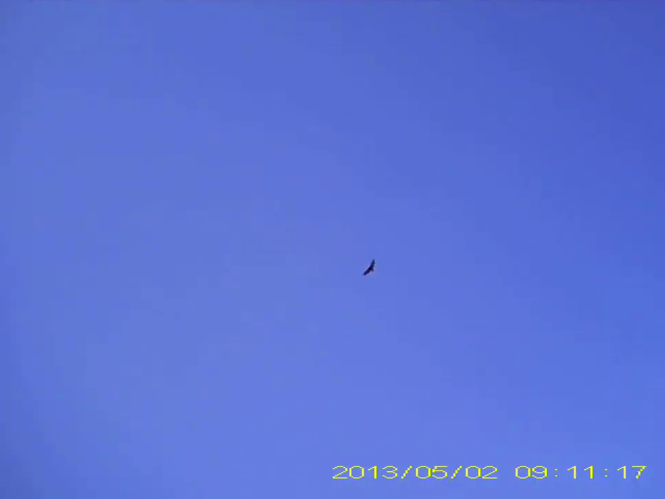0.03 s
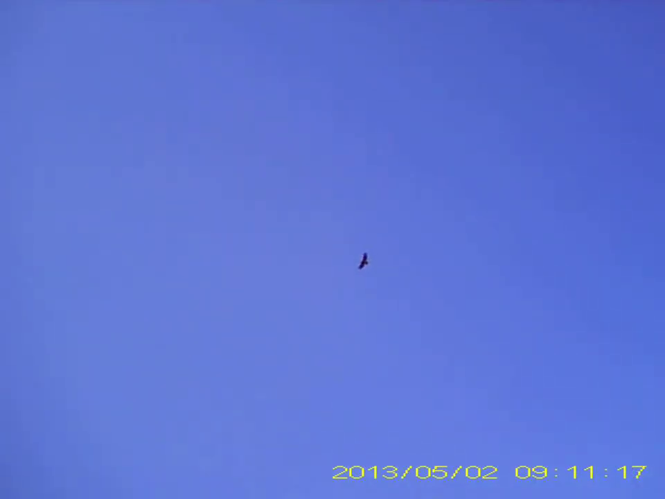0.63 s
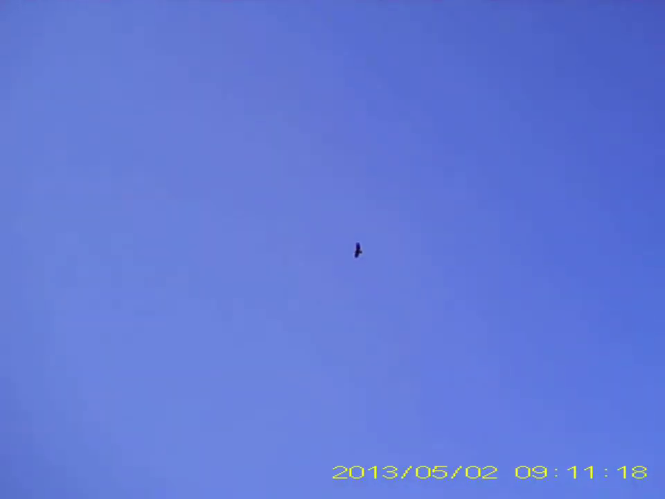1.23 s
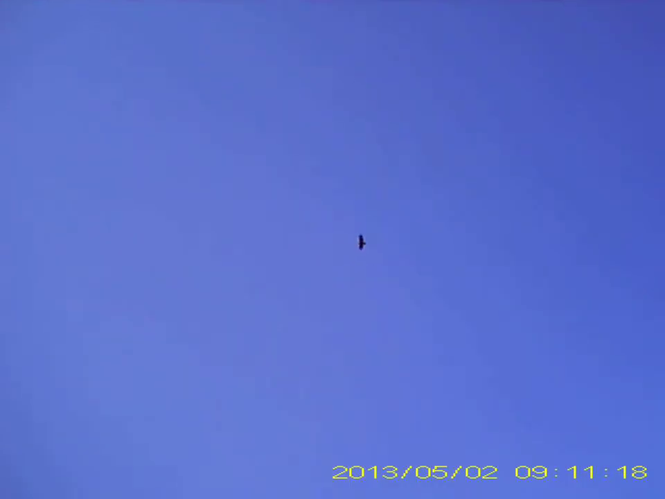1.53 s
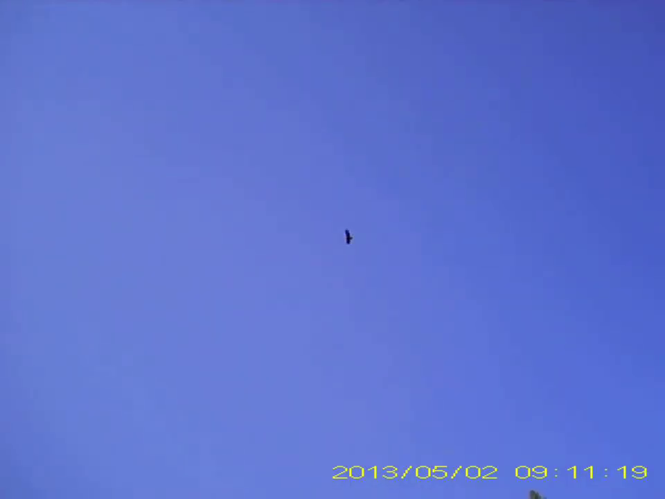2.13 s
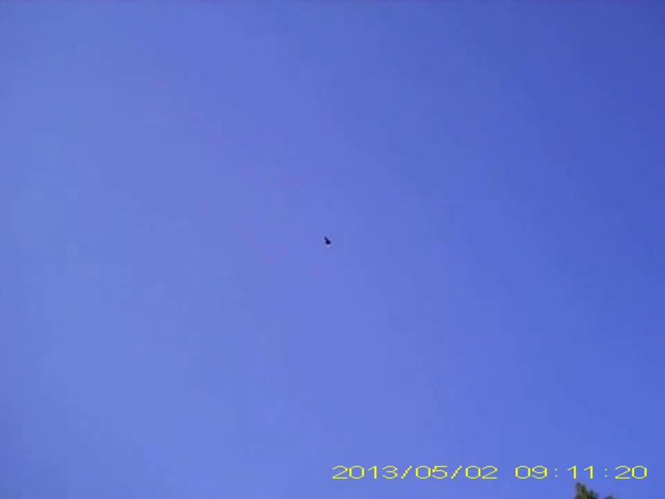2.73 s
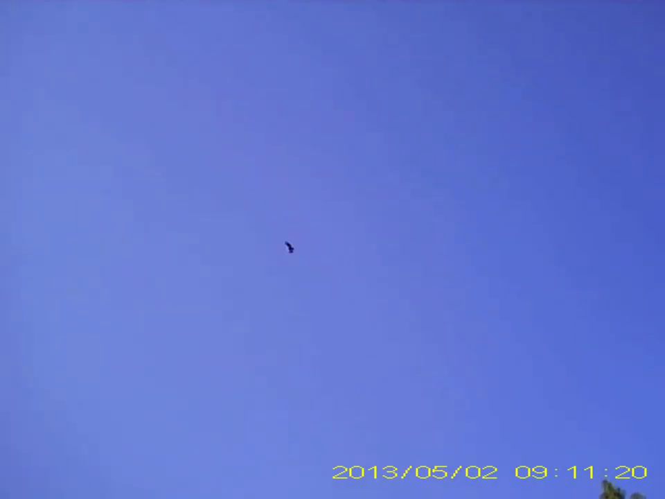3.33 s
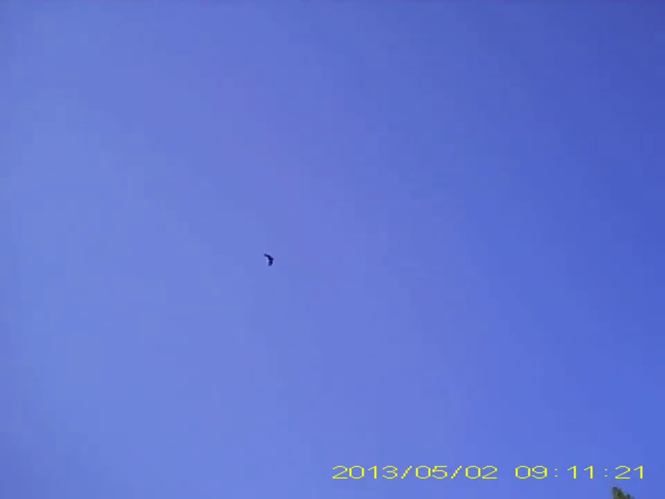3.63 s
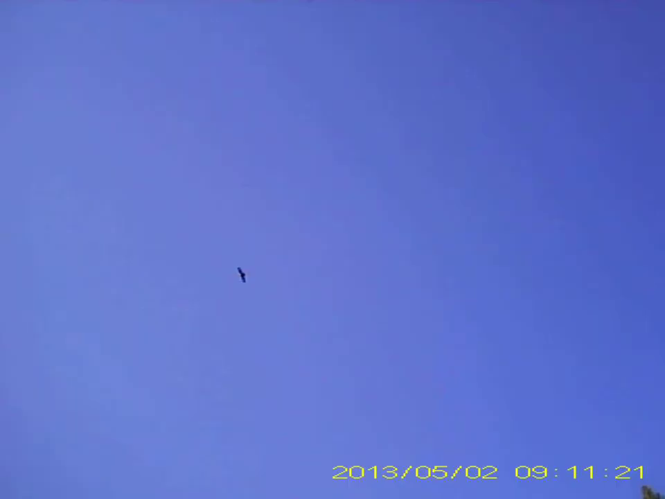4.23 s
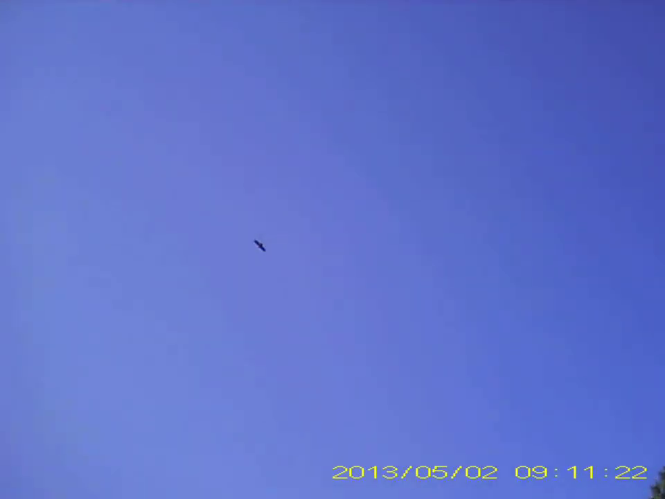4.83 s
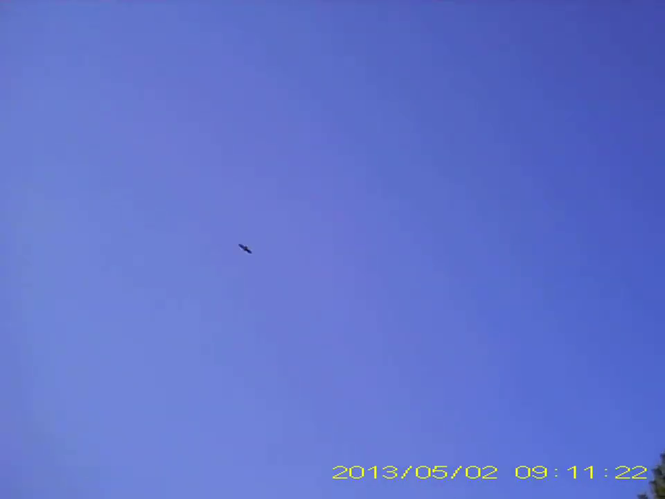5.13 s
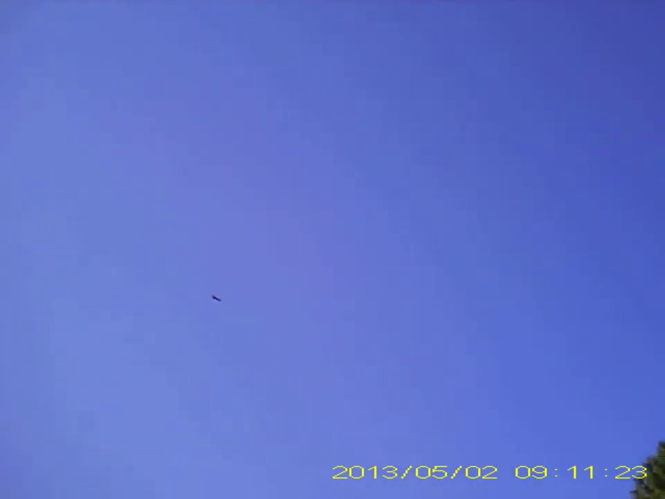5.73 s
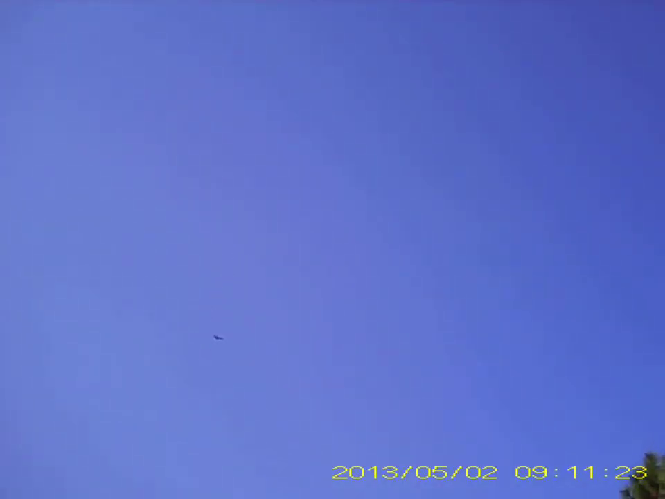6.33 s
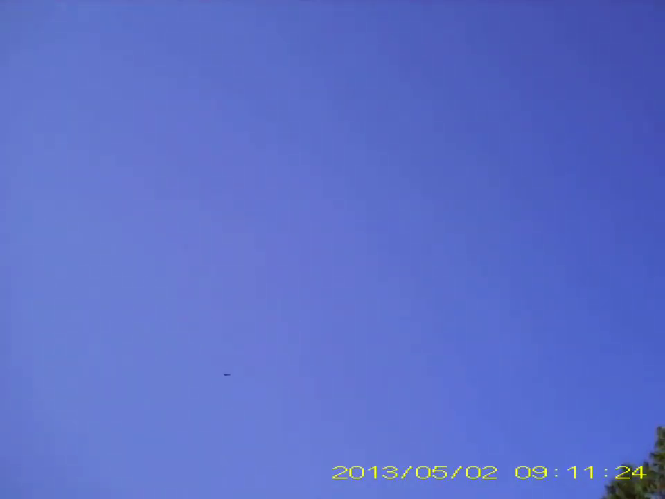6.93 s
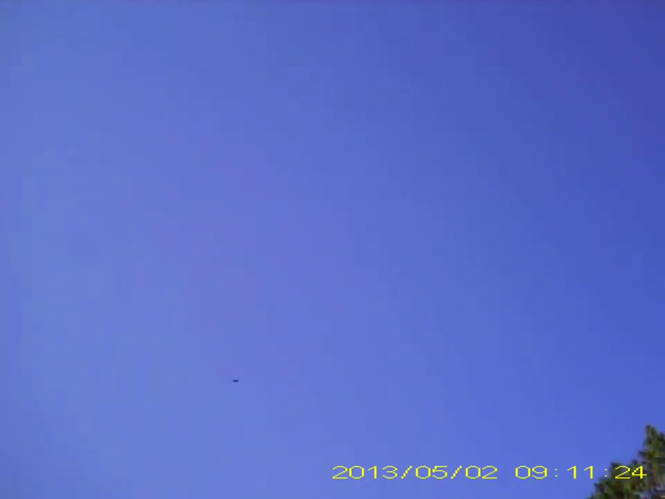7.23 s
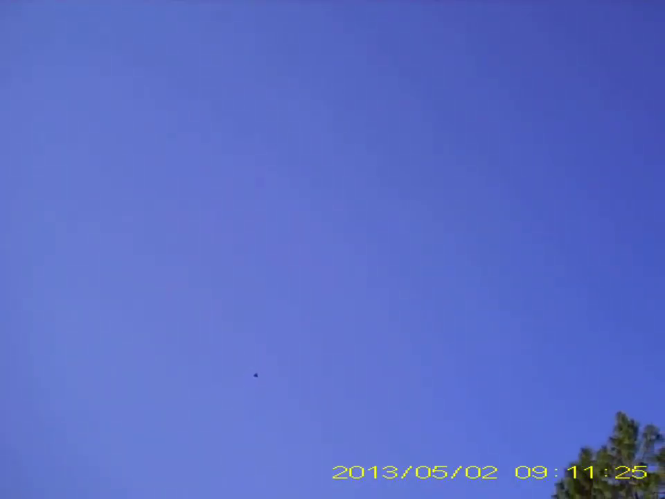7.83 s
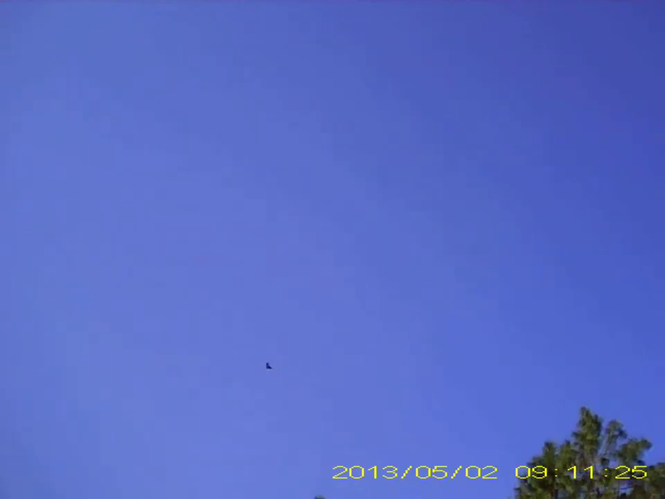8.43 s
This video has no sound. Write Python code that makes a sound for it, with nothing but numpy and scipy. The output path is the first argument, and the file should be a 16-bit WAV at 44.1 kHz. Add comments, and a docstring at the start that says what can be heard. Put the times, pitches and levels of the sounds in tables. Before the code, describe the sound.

A single raspy hawk scream sounds from high in the open sky, lasting about a second and a half and sagging slightly in pitch. Before and after it, low wind flutters against the microphone, gusty at first and then in weaker puffs. A few very faint peeps from a small bird follow the scream. Underneath are an even hiss, a thin electronic whine and regular soft ticking from the camera.

```python
"""Hawk scream in light wind

A hawk far overhead gives one long hoarse scream: a short yelp, a leap in pitch, then two rasping
tones, one from each side of the syrinx. A small bird peeps faintly; trees echo both birds.
Wind buffets the microphone of a small camera, whose electronics hiss, whine and tick twice a second."""
import sys
import numpy as np
from scipy import signal
from scipy.fft import rfft, irfft, next_fast_len
from scipy.io import wavfile
from scipy.ndimage import map_coordinates

SR = 44100
rng = np.random.default_rng(int(sys.argv[2]) if len(sys.argv) > 2 else 0)


def transcribe(signal):
    """Save signal, clipped to [-1, 1], as a 16-bit WAV file at the path in sys.argv[1]."""
    frames = np.atleast_2d(signal).T
    limited = np.clip(frames, -1, 1)
    pcm = np.round(limited * 32767).astype(np.int16)
    wavfile.write(sys.argv[1], SR, pcm)


N = 373527
TIME_S = np.arange(N) / SR


def amp(db):
    """Decibels to gain."""
    return 10 ** (np.asarray(db) / 20)


def unit(x):
    """Scale to rms 1."""
    return x / np.sqrt(np.mean(x ** 2) + 1e-20)


def curve(points):
    """(t/s, value) points to one value per sample."""
    return np.interp(TIME_S, *np.transpose(points))


def bump(centre_s, width_s):
    """Gaussian of height 1; width_s from centre to 1/e."""
    return np.exp(-np.minimum(((TIME_S - centre_s) / width_s) ** 2, 50))


def ramp(start_s, length_s):
    """Linear rise from 0 to 1."""
    return np.clip((TIME_S - start_s) / length_s, 0, 1)


def wobble(rate_hz):
    """Smooth random curve, rate_hz knots a second."""
    knots = rng.standard_normal(int(N * rate_hz / SR) + 4)
    return map_coordinates(knots, [np.arange(N) * rate_hz / SR])


def filtered(x, response):
    """Apply a complex frequency response."""
    size = next_fast_len(N + SR // 2)
    return irfft(rfft(x, size) * response(np.fft.rfftfreq(size, 1 / SR)), size)[:N]


def noise(spectrum):
    """Noise of rms 1, coloured by (f/Hz, relative level/dB) points on a log axis."""
    knots_hz, db = np.transpose(spectrum)
    colour = lambda hz: amp(np.interp(np.log(hz + 1), np.log(knots_hz), db, left=-120, right=-120))
    return unit(filtered(rng.standard_normal(N), colour))


def tones(lines):
    """Steady sines of random phase from (f/Hz, rms level/dB) rows."""
    return sum(np.sqrt(2) * amp(db) * np.sin(2 * np.pi * (hz * TIME_S + rng.random()))
               for hz, db in lines)


# Hiss spectrum: f/Hz, relative level/dB
HISS_SPECTRUM = [(60, -8), (200, 0), (400, -2.5), (600, -5), (1000, -7.5), (1900, -11), (2500, -15.5),
                 (3200, -18.5), (4200, -22), (5500, -27.5), (7500, -31.5), (10300, -35.5), (11300, -37),
                 (12000, -58)]

def hiss():
    """Even rush of air and microphone noise."""
    return amp(-60.5 + 0.18 * wobble(11)) * noise(HISS_SPECTRUM)


# Steady hum and gated readout lines: f/Hz, rms level/dB
HUM_LINES = [(275, -69.5), (385.7, -77), (771.4, -80.5), (1157.1, -82.5), (1542.8, -85), (10702.1, -81),
             (11347.9, -88)]
READOUT_LINES = [(3021.4, -88.5), (3407.1, -87.5), (3792.9, -83), (4178.6, -76), (4564.3, -74), (4950, -88),
                 (5335.6, -96.5), (8357.1, -99), (8742.9, -84.5), (9128.6, -91), (9514.3, -98.5),
                 (9900, -100)]

def whine(frame_hz=17.141, pause_phase=0.838, half_pause_s=.0016, edge_s=.0004):
    """Camera hum, plus image sensor readout that pauses between frames."""
    from_pause_s = np.abs((TIME_S * frame_hz - pause_phase + .5) % 1 - .5) / frame_hz
    reading = np.clip((from_pause_s - half_pause_s) / edge_s, 0, 1)
    return tones(HUM_LINES) + reading * tones(READOUT_LINES)


# Supply steps: t/s, relative level/dB
SUPPLY_STEPS = [(0.189, -37.5), (0.6998, -42), (1.2297, -42), (1.7503, -38.5), (2.2705, -38), (2.7907, -39),
                (3.329, -38), (3.8511, -40), (4.371, -39.5), (4.8815, -40.5), (5.422, -41), (5.9319, -39.5),
                (6.452, -40), (6.9723, -41), (7.512, -38.5), (8.0828, -39)]

def ticks(leak_hz=45, edge_hz=2100):
    """The supply voltage steps up and down in turn; each step leaks away through the input coupling."""
    impulses = np.zeros(N)
    for k, (at_s, db) in enumerate(SUPPLY_STEPS):
        impulses[round(at_s * SR)] = (-1) ** k * amp(db)
    leak = lambda hz: SR / (2 * np.pi * (leak_hz + 1j * hz))
    soft_edge = lambda hz: 1 / (1 + 1.5j * hz / edge_hz - (hz / edge_hz) ** 2)
    return amp(2.4) * filtered(impulses, lambda hz: leak(hz) * soft_edge(hz))


# Buffet envelope, gusty first half, lull, three puffs: t/s, relative level/dB
GUSTS = [(0, -49.5), (.25, -47.5), (.59, -38.5), (.95, -42), (1.24, -39.5), (1.52, -49), (1.66, -42.5),
         (1.9, -48), (2.38, -39.5), (2.6, -46), (2.88, -42), (3.35, -47.5), (3.55, -43.5), (3.95, -46.5),
         (4.2, -53), (4.78, -56.5), (4.88, -44.5), (5.05, -52), (6.3, -52), (6.46, -45.5), (6.62, -53),
         (6.92, -45), (7.3, -47), (7.75, -55), (8.47, -50.5)]
# Wind spectra: f/Hz, relative level/dB
EDDY_SPECTRUM = [(8, -4), (20, 0), (45, -0.5), (80, -3.5), (120, -9.5), (180, -16), (260, -26.5),
                 (450, -41.5)]
FLUTTER_SPECTRUM = [(20, -8.5), (35, 1), (60, 3.5), (120, 1), (190, -6), (260, -17.5), (340, -21.5),
                    (500, -36), (900, -51.5)]
RUSTLE_SPECTRUM = [(200, -11), (380, 0), (600, -4), (1000, -11), (2000, -29)]

def wind(full_gust_db=-40, rustle_db=-70, rustle_db_per_db=1.6):
    """Weak air rolls over the microphone in slow eddies; gusts break into lumpy flutter and rustle."""
    level_db = curve(GUSTS)
    gusty = np.clip((level_db + 51) / 11, .02, .9)
    level_db += 1.28 * wobble(12)
    eddies = unit(noise(EDDY_SPECTRUM) * amp(0.68 * wobble(14)))
    lumps = amp(3.6 * wobble(70))
    flutter = unit(noise(FLUTTER_SPECTRUM) * lumps)
    rustle = unit(noise(RUSTLE_SPECTRUM) * lumps)
    buffet = amp(0.57) * np.sqrt(1 - gusty) * eddies + amp(0.24) * np.sqrt(gusty) * flutter
    rustle_gain = amp(rustle_db + rustle_db_per_db * (level_db - full_gust_db))
    return amp(level_db) * buffet + rustle_gain * rustle


# Single eddies: t/s, peak level/dB
EDDY_HITS = [(0.569, -31), (0.594, -28.5), (1.24, -29.5), (2.306, -27.5), (2.394, -37), (2.449, -33.5),
             (2.91, -33)]

def thumps(width_s=0.0016):
    """An eddy hitting the microphone port gives one short push between two weaker pulls."""
    lobe = lambda u: (1 - u ** 2) * np.exp(-u ** 2 / 2)
    return sum(amp(db) * lobe(np.clip((TIME_S - at_s) / width_s, -10, 10)) for at_s, db in EDDY_HITS)


def trees(x, t60_s=0.27, wet_db=-12.5):
    """Surrounding trees scatter a faint short echo."""
    delay_s = np.arange(SR // 2) / SR
    tail = rng.standard_normal(len(delay_s)) * amp(-60 * delay_s / t60_s)
    return x + amp(wet_db) * signal.fftconvolve(x, tail / np.linalg.norm(tail))[:N]


# Peeps: t/s, f/Hz, level/dB
BIRD_PEEPS = [(2.38, 3930, -78), (4.34, 3720, -80), (4.63, 3620, -76), (4.94, 3860, -76)]

def small_bird(width_s=.018):
    """Short distant whistles, barely above the hiss."""
    return sum(amp(db) * bump(at_s, width_s) * tones([(hz, 0)]) for at_s, hz, db in BIRD_PEEPS)


def syrinx_tone(pitch_hz, jitter, jitter_rate_hz, shimmer_db):
    """One side of the syrinx: a whistle whose pitch and strength shake irregularly."""
    shaken_hz = pitch_hz * (1 + jitter * wobble(jitter_rate_hz))
    phase = 2 * np.pi * np.cumsum(shaken_hz) / SR
    return unit(np.sin(phase) * amp(shimmer_db * wobble(180)))


# Upper tone's base pitch: t/s, f/Hz
SCREAM_PITCH = [(2.28, 2920), (2.305, 3060), (2.34, 3110), (2.39, 2960), (2.47, 2850), (2.72, 2700),
                (2.94, 2850), (3.47, 2855), (3.52, 2630), (3.7, 2550)]
# Swells: t/s, half-width/s, strength/0-1
SCREAM_SWELLS = [(2.54, .06, .7), (3.025, .045, 1), (3.275, .05, .9), (3.415, .022, .9)]
# Rasp spectrum: f/Hz, relative level/dB
RASP_SPECTRUM = [(900, -33), (1300, 3), (1750, 7.5), (2100, -1), (2400, 3), (2800, 0), (3100, -14),
                 (4000, -33)]

def hawk():
    """A clean yelp leaps to a hoarse two-tone scream, which ends on an accent of the lower tone."""
    yelp_hz, lower_hz, waver_hz, swell_flat_hz = 2346, 1994, 35, 170
    yelp_db, upper_db, lower_db, rasp_db, accent_db = -55, -75, -71, -67.5, -68
    leap_s, lower_start_s, end_s = 2.275, 2.34, 3.7
    settle_s, release_s, fade_db_per_s = .13, .03, 2.5

    age_s = np.maximum(TIME_S - leap_s, 0)
    yelp = bump(2.272, .0084)
    leap = ramp(leap_s, .006)
    opening = np.exp(-age_s / settle_s)
    crack = .8 * bump(2.325, .028)
    slack = bump(2.81, .055)
    accent = bump(3.662, .013)
    held = 1 - ramp(end_s - release_s, release_s)

    # Swells lift the upper tone, clear the voice and pull both tones flat.
    swell = sum(strength * bump(at_s, width_s) for at_s, width_s, strength in SCREAM_SWELLS)
    hoarse = (1 - .35 * opening) * (1 - .34 * swell) * (1 - .5 * accent)
    flat_hz = swell_flat_hz * swell
    upper_hz = yelp_hz + leap * (curve(SCREAM_PITCH) - yelp_hz) - flat_hz
    upper_hz += waver_hz * hoarse * wobble(30)

    upper_gain = leap * held * amp(upper_db + 9 * opening + 7 * swell - fade_db_per_s * age_s)
    upper_gain += amp(yelp_db) * yelp
    lower_shape = ramp(lower_start_s, .015) * held * amp(0.8 * wobble(21.96) + 2.5 * opening - 7 * slack)

    upper = upper_gain * syrinx_tone(upper_hz, .021 * hoarse, jitter_rate_hz=420, shimmer_db=3 * hoarse)
    lower = syrinx_tone(lower_hz - flat_hz, .037 * hoarse, jitter_rate_hz=380, shimmer_db=3.5)
    lower *= amp(lower_db) * lower_shape + amp(accent_db) * accent
    rasp = unit(noise(RASP_SPECTRUM) * amp(2.2 * wobble(120)))
    rasp *= amp(rasp_db) * hoarse * lower_shape
    # The voice cracks at the top of the leap.
    sidebands = crack * upper * noise([(200, -5), (420, 0), (800, -20)])
    return upper + sidebands + lower + rasp


def scene():
    """Birds among trees, wind and camera noise, in mono."""
    birds = trees(hawk() + small_bird())
    air = wind() + thumps()
    return (birds + air + hiss() + whine() + ticks())[None]


def record(dry, top_hz=11806, dc_offset=-.007):
    """The camera cuts everything above its band limit; its converter rests slightly below zero."""
    return filtered(dry[0], lambda hz: hz < top_hz)[None] + dc_offset


dry = scene()
out = record(dry)
transcribe(out)
```